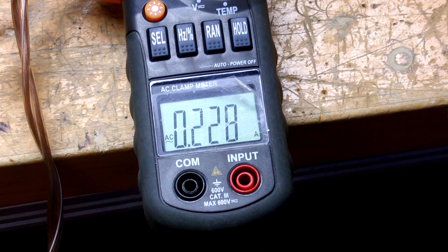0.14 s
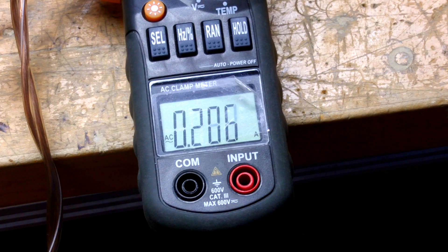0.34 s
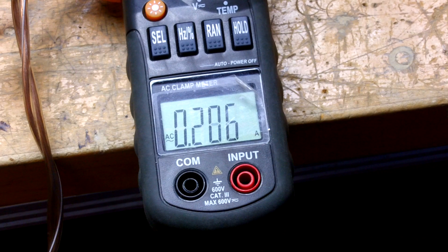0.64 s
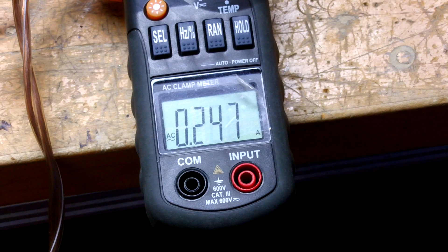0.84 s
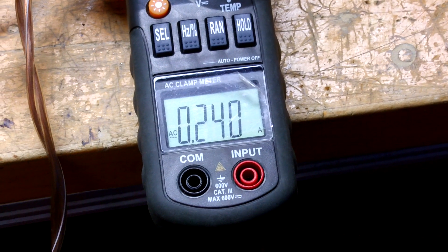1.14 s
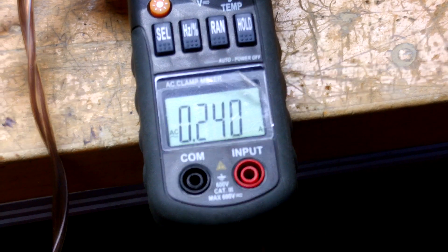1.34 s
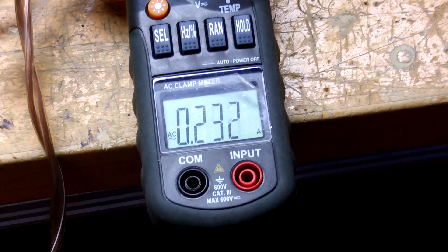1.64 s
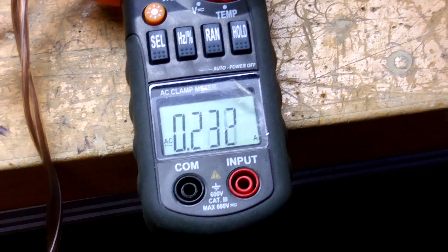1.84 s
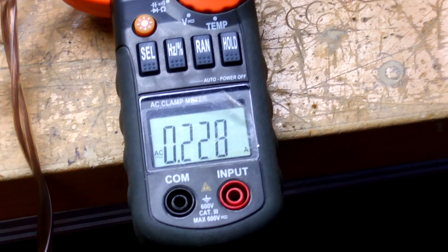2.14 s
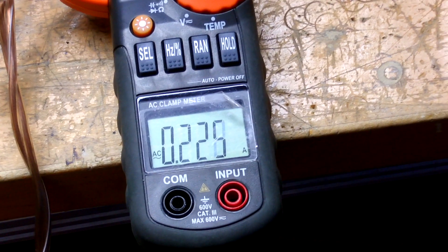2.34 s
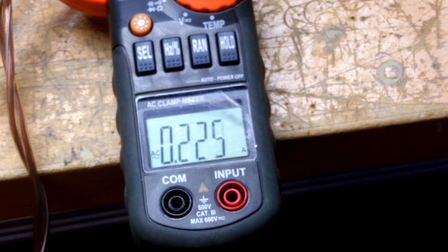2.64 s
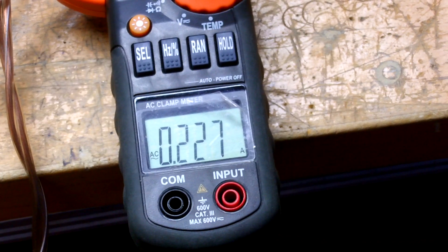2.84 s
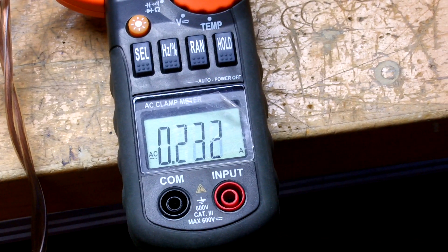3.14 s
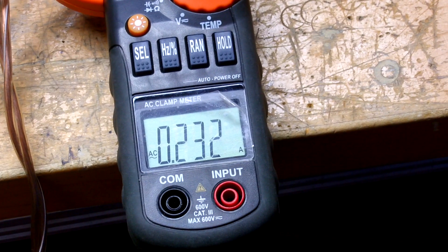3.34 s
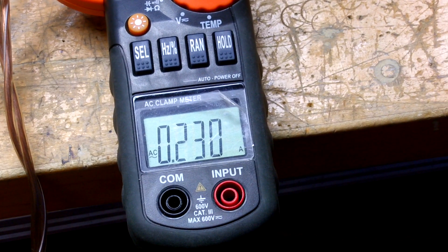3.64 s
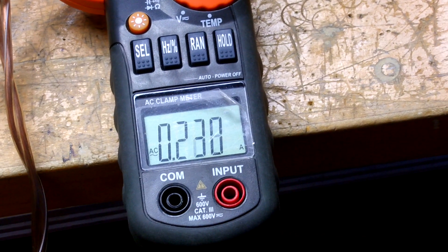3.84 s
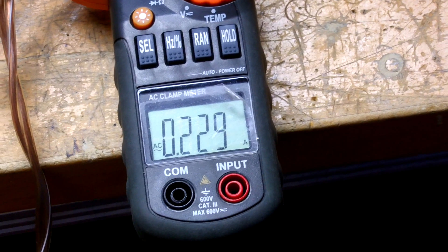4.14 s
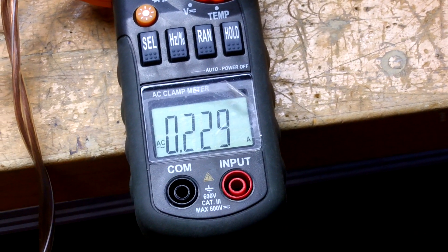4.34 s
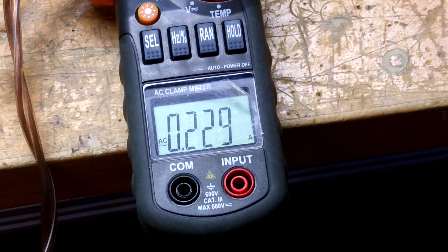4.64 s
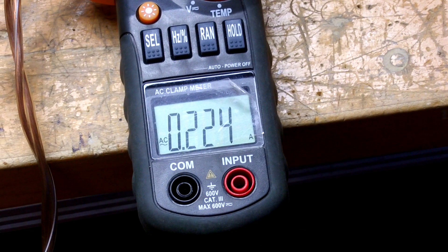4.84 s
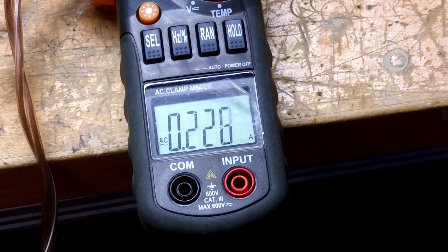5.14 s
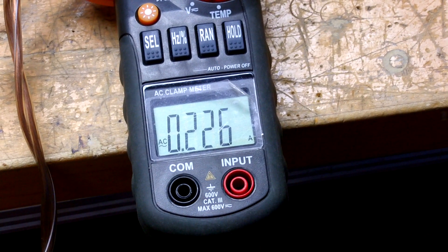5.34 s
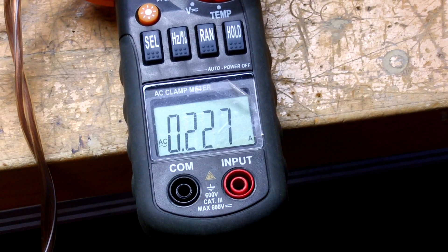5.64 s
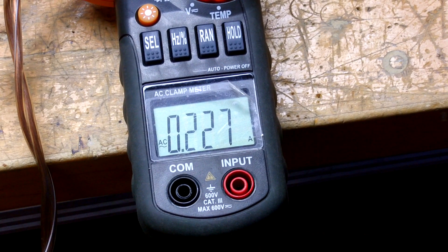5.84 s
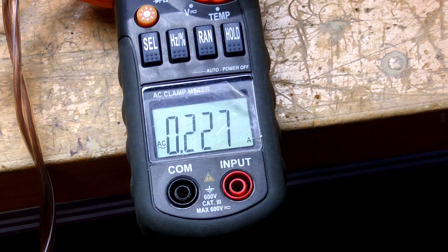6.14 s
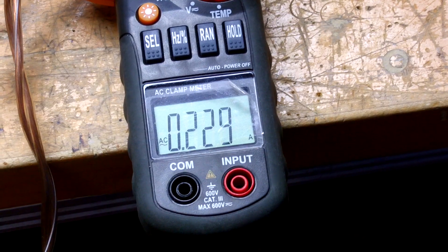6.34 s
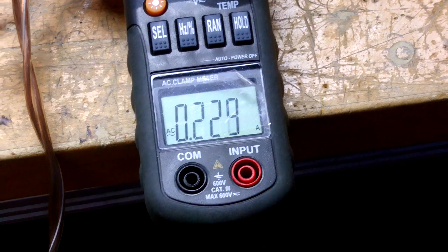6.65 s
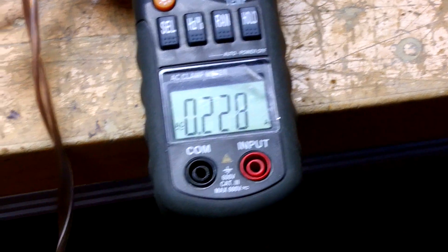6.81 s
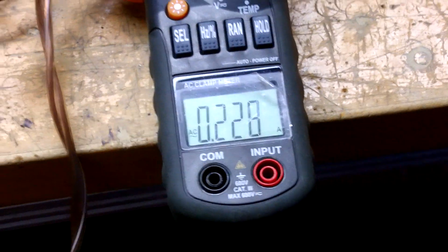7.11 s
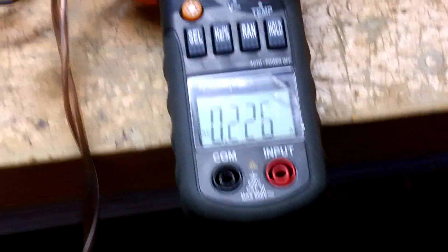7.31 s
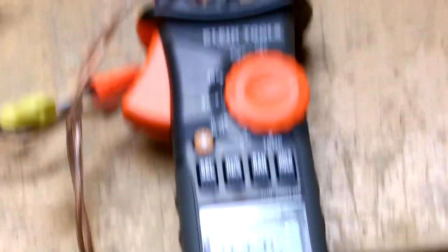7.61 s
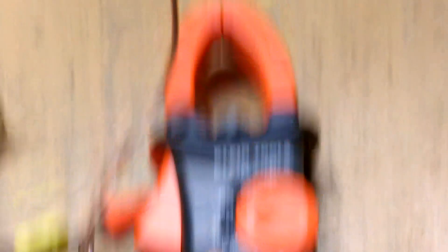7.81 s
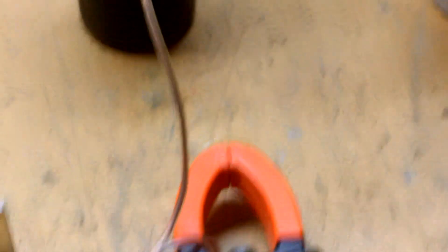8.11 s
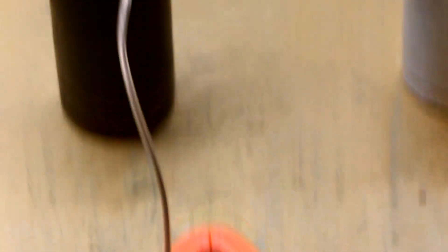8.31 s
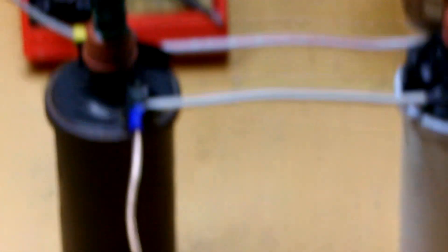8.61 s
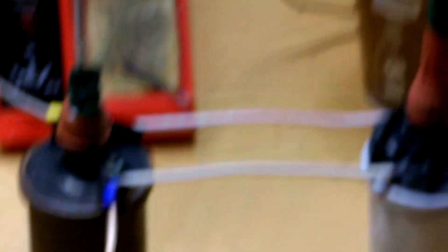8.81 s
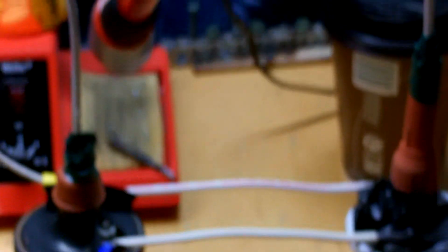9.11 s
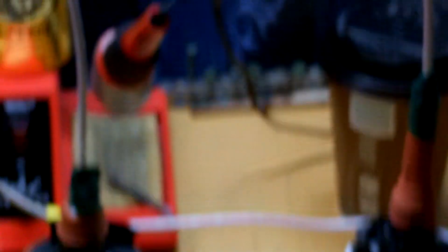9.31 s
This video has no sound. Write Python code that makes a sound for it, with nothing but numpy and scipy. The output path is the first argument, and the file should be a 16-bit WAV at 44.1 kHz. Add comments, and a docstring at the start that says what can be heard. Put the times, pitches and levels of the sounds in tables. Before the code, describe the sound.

Irregular dry electric cracks and hissing arc fizz buzz on at mains rate, with brief metallic bench ringing and a short room tail.

```python
"""High-voltage spark gap on a workbench

A mains-fed coil arcs close to a hand-held camera: sharp snaps near the mains crests, or a held, sizzling arc.
Snaps are filtered impulses; fizz is weak snaps and stray ticks; sizzle is sparse noise gated by mains phase.
Moving echoes, bench modes and a sparse-tap room answer them; filters give camera aim and microphone ports.
Faint rumble and hum lie below; the loudest peaks overload into thumps, are limited and clipped."""
import sys
import numpy as np
from scipy import signal
from scipy.fft import rfft, irfft, next_fast_len
from scipy.io import wavfile
from scipy.ndimage import uniform_filter1d, minimum_filter1d, map_coordinates

SR = 44100
rng = np.random.default_rng(int(sys.argv[2]) if len(sys.argv) > 2 else 0)


def int16_out(signal):
    """Quantize to a 16-bit WAV file."""
    q = np.round(np.clip(np.atleast_2d(signal).T, -1, 1) * 32767)
    wavfile.write(sys.argv[1], SR, q.astype(np.int16))


N = 417627
TIME = np.arange(N) / SR
MAINS_HZ = 59.991
EDGE_HZ = 16400
# two breakdown points after the cycle start, and rms jitter
EARLY_S, LATE_S, JITTER_S = .0016, .0031, .00025

# prominent sparks [t/s, relative energy/dB, extra weight below crossover/dB]
SPARKS = [(0.0032, 6, 9), (0.0276, 2.5, 7), (0.111, 4, 5), (0.1204, -1, 9), (0.1867, 0, 7), (0.2032, 4, 7),
          (0.2176, 5, 4), (0.336, 6.5, 7), (0.3697, 8, 4), (0.3841, 1, 4), (0.4346, 3.5, 7.5),
          (0.5179, 4.5, -2), (0.5516, 6.5, -9), (0.6181, 6.5, -3), (0.638, 5.5, 3), (0.6531, 5.5, -6),
          (0.753, 7.5, 3), (0.8005, 8.5, -0.5), (0.82, 4.5, -1), (0.853, 7.5, -3), (0.885, 5.5, 7),
          (0.8965, 3.5, 1), (0.9194, 4, 4), (0.9867, 4.5, 5.5), (1.0347, 3.5, -3), (1.087, 6.5, 1),
          (1.153, 4, 6.5), (1.2011, 7, 2), (1.2683, 6.0, 5.5), (1.3182, 8.5, 1.5), (1.3518, 6.5, 3),
          (1.4202, 6, 1), (1.436, 4.5, 7.5), (1.503, 4.5, 5.5), (1.553, 4, 5.5), (1.62, 3.5, -3),
          (1.6687, 6, 3.5), (1.8184, 3, -7), (1.8517, 6, 5.5), (1.8684, 5, -7), (1.9017, 6.5, 5.5),
          (1.9518, 7, 4.5), (2.0015, 3.5, 6), (2.0192, 5.5, 5), (2.0866, 6.0, 5), (2.136, 0, -4),
          (2.1516, 0.5, 0), (2.2183, 7, 5), (2.235, 6.5, 3), (2.2697, 3.5, 7.5), (2.3187, 5.5, 6.5),
          (2.335, 3, 3), (2.3458, 2.5, 10), (2.4681, 6.0, 5.5), (2.4861, 2.5, 6), (2.6015, 5.5, 4.5),
          (2.6184, 0.5, -2), (2.6362, 3, -3), (2.6699, 2.5, 8), (2.7682, 7.5, 2), (2.8535, 0.5, 6),
          (2.9681, 9, 3), (3.2017, 2, -1), (3.2534, 8.5, 2.5), (3.3683, 4, -0.5), (3.4018, 9.5, 0),
          (3.453, 10.5, 3), (3.5033, 8.5, 3.5), (3.6017, 7.0, -1), (3.819, -3.5, 5.5), (3.8518, 6, -2),
          (4.0523, 2, 1), (4.1033, 9.5, -2.5), (4.2513, 5.5, -1.5), (4.3853, 5, -1.5), (4.4853, 8, 0),
          (4.5036, 9.5, 5.5), (4.5535, 10.0, 5), (4.6534, 6.5, -2), (4.6684, 6.5, 0), (4.6863, 6.5, 4.5),
          (4.8342, 9, -4), (4.9019, 3.5, -6), (4.9188, 7.0, -0.5), (4.9629, 4, -4), (5.0019, 6.5, -0.5),
          (5.1847, 10, -0.5), (5.2191, 7, 4.5), (5.3019, 6.0, -3), (5.3537, 11.5, 0), (5.4017, 6, 2.5),
          (5.4353, 7.5, 4), (5.469, 2.5, -2), (5.5535, 2.5, -1), (5.6352, 11.5, 1), (5.6531, 5.5, -4),
          (5.6869, 10.0, 1), (5.7538, 7.5, 2), (5.7681, 8, -2), (5.8019, 7, 4), (5.9034, 6, -5),
          (5.9792, 4.5, -11), (6.003, 9.5, 1), (6.0522, 6.5, 4), (6.0853, 7, 5.5), (6.1355, 6, 5),
          (6.1703, 7.5, 5), (6.3186, 10.5, 1), (6.4184, 0.5, -1), (6.6854, 12.5, -6), (6.7188, 11, 8.5),
          (6.736, 9.5, 0.5), (6.8521, 9, -6), (6.904, 8.5, 4), (7.0208, 8, 4), (7.0886, 8.5, 2),
          (7.1543, 6, 5), (7.186, 8, 2.5), (7.2366, 8, 4), (7.2866, 6.5, 4), (7.4037, 8.5, 4.5),
          (7.5389, 6, 6), (7.6539, 0.5, 2.5), (7.7546, 10.5, 2.5), (7.8301, 6, 1), (7.9377, 8.5, 4),
          (8.0201, 6, 5), (8.1363, 0.5, -0.5), (8.202, 3, 0), (8.2209, 4.5, -8), (8.2552, 6.5, -5),
          (8.269, 6, -1), (8.2877, 11, 0.5), (8.371, 8, 5), (8.4861, 2.5, -2), (8.504, 7.0, 8),
          (8.5201, 3, 1), (8.5364, 7.0, 3), (8.6212, 6, 4.5), (8.6388, 5.5, 3.5), (8.7044, 5.0, 7),
          (8.7853, 9.5, 1), (8.9027, 1.5, -1), (9.0357, 8.0, 7.5), (9.0703, 9.0, 4), (9.1197, 6, 5),
          (9.1706, 6.5, 6.5), (9.2044, 3.5, 5), (9.236, 5.5, 2), (9.2704, 5.5, 3)]
# arc strength between the sparks [t/s, relative level/dB]
ARC = [(0, -31.5), (.4, -31.5), (1.6, -38), (1.85, -33.5), (2.75, -38.5), (3.38, -30.5), (3.66, -35),
       (4.28, -27.5), (4.68, -37.5), (5.33, -31.5), (5.75, -34), (6.12, -30.5), (6.92, -30), (7.17, -34.5),
       (7.5, -30), (7.95, -33.5), (8.33, -29.5), (9.47, -35.5)]
# how firmly the arc holds and sizzles instead of snapping [t/s, share/0-1]
HOLD = [(0, 0.39), (2.7, 0.01), (3.05, 0.6), (3.7, 0.59), (4.47, 1), (4.7, 0.02), (6.0, 0.24), (6.6, 0.99),
        (6.9, 0.64), (9.4, 0.31)]
# camera place [t/s, bench echo delay/ms, bench echo level/dB, top treble/dB, left minus right/dB]
PATHS = [(0, 1.31, -7.5, -3.5, 0.5), (2.3, 1.56, -10, 1, 0.5), (3.2, 1.45, -4, -2, 0.5),
         (4.6, 1.51, -5, -6.5, 0.4), (5.3, 1.38, -11.5, -7.5, 0.3), (6.1, 1.52, -7, -8.5, -0.2),
         (6.7, 1.57, -4, -15, 0.4), (7.4, 1.4, -7.5, -4, -0.2), (8.0, 1.6, -8, -2.5, 0),
         (8.6, 1.27, -9, -1.5, -0.8), (9.4, 1.4, -13, 3, 0.3)]
# half of a left-minus-right difference, one row per port [signed share]
SIDES = np.array([[.5], [-.5]])


def gain_of(db):
    """Decibels to amplitude."""
    return 10 ** (np.asarray(db) / 20)


def evened(x):
    """Scales to rms 1."""
    return x / np.sqrt(np.mean(x ** 2) + 1e-20)


def curve(rows, column=1):
    """One column of a time table at every sample."""
    rows = np.array(rows)
    return np.interp(TIME, rows[:, 0], rows[:, column])


def spectrum(rows, hz):
    """All value columns of a frequency table, joined on a log axis."""
    f, *columns = np.transpose(rows)
    return [np.interp(np.log(hz + 1), np.log(f + 1), c) for c in columns]


def clicks(times_s, sizes):
    """A train of single impulses."""
    index = np.clip(np.round(times_s * SR).astype(int), 0, N - 1)
    return np.bincount(index, sizes, N)


def lowpass(x, hz):
    """One-pole low-pass."""
    return signal.lfilter(*signal.butter(1, min(hz, .45 * SR), fs=SR), x)


def bandpass(x, hz, q):
    """Two-pole resonance, unity gain at its centre."""
    return signal.lfilter(*signal.iirpeak(hz, q, SR), x)


def delayed(x, ms):
    """Delays by a moving, fractional time."""
    return map_coordinates(x, [np.arange(N) - ms * SR / 1000], order=5)


def coloured(x, rows, size=4096):
    """Causal filter with the given spectrum shape and unit energy."""
    db = spectrum(rows, abs(np.fft.fftfreq(size, 1 / SR)))[0]
    log_gain = np.log(gain_of(db))
    taps = np.fft.ifft(np.exp(signal.hilbert(log_gain).conj())).real[:size // 2]
    return signal.oaconvolve(x, taps / np.linalg.norm(taps))[:N]


def sparks(level_db=0.0, crossover_hz=2200, weight_db=0., fork_db=-8.5, fork_s=.00022,
           bite_hz=4200, bite_width_hz=1600, bite_spread_db=4):
    """Each breakdown is one shock; a fat channel adds weight and its kinks arrive a little apart."""
    s, db, fat_db = np.vstack([lesser_snaps(), SPARKS]).T
    size = gain_of(db + level_db)
    shock = clicks(s, size)
    weight = clicks(s, size * (gain_of(fat_db + weight_db) - 1))
    # three kinks each, up to fork_s late, of random strength and sign
    chance = rng.random((len(s), 6))
    kinks = sum(clicks(s + fork_s * late, size * (2 * strength - 1))
                for late, strength in zip(chance.T[:3], chance.T[3:]))
    fork = gain_of(fork_db) * (kinks - lowpass(kinks, crossover_hz))
    # channel length differs per spark, and with it the bite in the upper middle
    bite_db = bite_spread_db * rng.uniform(-0.39, 1, len(s))
    bite = bandpass(clicks(s, size * (gain_of(bite_db) - 1)), bite_hz, bite_hz / bite_width_hz)
    return shock + bite + lowpass(weight, crossover_hz) + fork


def lesser_snaps(level_db=-0.25, spread_db=4, weight_spread_db=4, step=0.33, lull=.5):
    """A restless gap snaps fairly evenly on crests; a loud spark takes a cycle's charge, often after a lull."""
    # restlessness of the gap [t/s, snap chance per crest before lulls/0-1, mean extra weight/dB]
    restless = [(0, .95, -2.5), (0.552, .95, -1), (.75, .3, 6.5), (1.75, .15, -12), (1.9, .65, -5),
                (2.45, .55, -7), (3.0, 0.05, -6), (3.35, 0.49, -12), (3.6, .03, 0), (4.5, 0.14, -5),
                (4.8, .8, -19), (5.6, .85, -4), (6.3, .35, -4.5), (7.3, .03, 17.5), (8.05, .12, -9),
                (8.2, 0.4, 9), (8.7, .08, -22), (9.1, .65, 2), (9.35, 0.14, -2.5)]
    s = crests()
    turn, size, weight = rng.uniform(-1, 1, (3, len(s)))
    at, chance, weight_db = np.transpose(restless)
    loud = np.isin(np.floor(s * MAINS_HZ), np.floor(np.array(SPARKS)[:, 0] * MAINS_HZ))
    loud_next = np.roll(loud, -1)
    chance = np.interp(s, at, chance) * (1 - lull * loud_next) * ~loud
    # irregular phase steps space the snaps more evenly than independent draws
    fires = np.cumsum(step * (1 + turn / 2)) % 1 < chance
    db = np.where(fires, level_db + spread_db * size, -np.inf)
    return np.transpose([s, db, np.interp(s, at, weight_db) + weight_spread_db * weight])


def crests():
    """One moment of breakdown in every mains cycle, early or late."""
    start = np.arange(int(N / SR * MAINS_HZ)) / MAINS_HZ
    pick, jitter = rng.standard_normal((2, len(start)))
    return start + np.where(pick > 0, EARLY_S, LATE_S) + JITTER_S * jitter


def small_snaps(level_db=-2.5, spread_db=6, reverse_s=.0134, reverse_db=-10):
    """Weak breakdowns, one on each crest; the reverse half-cycle typically strikes more faintly."""
    s = crests()
    size, back_jitter, back_size = rng.standard_normal((len(s), 3)).T
    forward = clicks(s, gain_of(spread_db * np.clip(size, -2, 1.5)))
    back_s = np.arange(len(s)) / MAINS_HZ + reverse_s + JITTER_S * back_jitter
    reverse = clicks(back_s, gain_of(reverse_db + spread_db * back_size))
    loose = 1 - np.clip(curve(HOLD), 0, 1)
    return gain_of(curve(ARC) + level_db) * loose * evened(forward + reverse)


def stray_ticks(level_db=-9, per_s=45, spread_db=5.0):
    """Loose streamers tick at any moment of the cycle, more faintly as the arc holds."""
    size = gain_of(spread_db * np.minimum(rng.exponential(1, N), 3))
    ticks = size * (rng.random(N) < per_s / SR)
    loose = 1 - np.clip(curve(HOLD), 0, 1)
    return gain_of(curve(ARC) + level_db) * loose * evened(ticks)


def sizzle(level_db=-0.5, per_s=9000, flicker_db=2.5, jitter_ms=0.32):
    """The held arc breaks into swarms of tiny discharges around set points of the mains cycle."""
    # bursts [mean t after cycle start/ms, Gaussian sigma/ms, mean relative level/dB]
    bursts = [(1.8, 0.31, -2.5), (3.8, 0.36, -2.5), (8, 6.5, -22.5), (13.5, 0.47, -3.5)]
    cycle, phase = np.divmod(TIME * MAINS_HZ, 1)
    cycle, ms = cycle.astype(int), phase * 1000 / MAINS_HZ
    gate = np.zeros(N)
    for at_ms, width_ms, db in bursts:
        shift, size = rng.standard_normal((cycle[-1] + 1, 2))[cycle].T
        off_centre = (ms - at_ms - jitter_ms * shift) / width_ms
        gate += gain_of(db + flicker_db * size) * np.exp(-.5 * off_centre ** 2)
    swarm = rng.standard_normal(N) * (rng.random(N) < per_s / SR)
    held = np.clip(curve(HOLD), 0, 1) ** 0.62
    return gain_of(curve(ARC) + level_db) * held * evened(gate * swarm)


def aimed(x, top_hz=11500, presence_hz=8500, presence_width_hz=2200):
    """The treble changes with the way the camera points."""
    # band near presence_hz, sinking as the camera turns [t/s, level/dB]
    presence = [(0, 2), (3.3, 1.5), (5.6, 1.5), (6.8, -1.5), (9.4, -3.5)]
    x = x + (gain_of(curve(PATHS, column=3)) - 1) * (x - lowpass(x, top_hz))
    band = bandpass(x, presence_hz, presence_hz / presence_width_hz)
    return x + (gain_of(curve(presence)) - 1) * band


def bench(x, edge_share, second_db, edge_side_db=3.9, edge_cut_hz=3200, second_ms=2.9):
    """A small edge returns short waves inverted; bench top and gear echo the result, the edge differing by port."""
    # nearby edge as the camera moves [t/s, delay/ms, level before share and port offset/dB]
    edge_echo = [(0, .39, -5), (6.1, .39, -7), (6.7, .39, -12), (7.4, .38, -14), (8.0, .33, -16),
                 (8.6, .265, -12)]
    edge_ms, edge_db = curve(edge_echo), curve(edge_echo, column=2)
    bench_ms, bench_db = curve(PATHS), curve(PATHS, column=2)
    diffracted = edge_share * delayed(x - lowpass(x, edge_cut_hz), edge_ms)
    pair = []
    for side in (-1, 1):
        edge = gain_of(edge_db + side * edge_side_db)
        near = (x - edge * diffracted) / np.sqrt(1 + (edge_share * gain_of(edge_db)) ** 2)
        first = gain_of(bench_db) * delayed(near, bench_ms)
        second = gain_of(second_db) * delayed(near, second_ms)
        pair.append(near + first + second)
    return np.array(pair)


def ringing(x, level_db=-4, split=0.0025):
    """Bench and gear ring briefly in close pairs of modes, one of each pair nearer either port."""
    # modes [f before detuning/Hz, width before detuning/Hz, relative level/dB]
    ring = [(682, 14, 2.5), (826, 28, 1), (1076, 67, 12.5), (1330, 61, 15), (1646, 50, 12), (2140, 14, -8),
            (4390, 23, 1)]

    def modes(detune):
        """All modes at one port."""
        return sum(gain_of(db) * bandpass(x, hz * detune, hz / width_hz) for hz, width_hz, db in ring)

    return gain_of(level_db) * np.array([modes(1 + split), modes(1 - split)])


def workshop(x, t60_scale, start_s, size=256):
    """Sparse reflections that die band by band; the ports differ most in the treble."""
    # room [f/Hz, t60 before scaling/s, left-right likeness/0-1, relative level/dB]
    room_bands = [(150, 0.17, 0.76, -3), (685, 0.28, 1, 2.5), (2280, 0.32, 1, 7), (4350, 0.22, 1, 1.5),
                  (10100, 0.3, 0.18, -2), (15900, 0.048, 0.092, 6)]
    count = SR // 2
    taps = rng.standard_normal((2, count)) * (rng.random((2, count)) < 1 / 5)
    hz, t, (a, b) = signal.stft(taps, SR, nperseg=size)
    t60, same, db = spectrum(room_bands, hz[:, None])
    same = np.clip(same, -1, 1)
    decay = gain_of(db - 60 * t / (t60 * t60_scale))
    z = np.array([a, same * a + np.sqrt(1 - same ** 2) * b]) * decay
    # silent until start_s, full at twice start_s
    onset = np.clip(np.arange(count) / SR / start_s - 1, 0, 1)
    tail = signal.istft(z, SR, nperseg=size)[1][:, :count] * onset
    return signal.fftconvolve(x[None], tail / np.linalg.norm(tail[0]), axes=1)[:, :N]


def wandering_room(x, t60_scale, start_s, half_turns_per_s=2.3, count=3):
    """The arc wanders in the gap, so the mix of several reflection patterns keeps changing."""
    shares = (np.cos(np.pi * (half_turns_per_s * TIME + k / count)) * np.sqrt(2 / count)
              for k in range(count))
    return sum(workshop(x * share, t60_scale, start_s) for share in shares)


def ports(x):
    """Two microphone ports colour the treble differently; a rising delay spreads each snap by under 1 ms."""
    # ports [f/Hz, left minus right/dB, left phase lead/rad]
    port_bands = [(100, 3, 0.64), (600, 1, -0.17), (2210, 0, -0.077), (4300, -1, -0.14), (7100, 0.5, -0.57),
                  (8060, 0, 0.49), (10120, -2, -1.57), (11750, -3, 1.25), (12200, -12.5, 0.84),
                  (12800, 7, 1.6), (14000, 1, 1.27), (15700, 5, 0.9)]
    smear_s = .00028  # delay at EDGE_HZ, proportional to frequency
    size = next_fast_len(N + 4096)
    hz = np.fft.rfftfreq(size, 1 / SR)
    balance_db, lead = spectrum(port_bands, hz)
    phase = SIDES * lead - np.pi * smear_s * hz ** 2 / EDGE_HZ
    pair = gain_of(SIDES * balance_db) * np.exp(1j * phase)
    pair = pair / np.sqrt(np.mean(abs(pair) ** 2, 0))
    return irfft(rfft(x, size) * pair, size)[:, :N]


def wander(x, lag_ms=0.0069, rate_hz=25):
    """The arc jumps about in the gap, so the time difference between the ports wavers (lag_ms rms)."""
    lag = lag_ms * evened(lowpass(lowpass(rng.standard_normal(N), rate_hz), rate_hz))
    return np.array([delayed(port, side * lag) for port, side in zip(x, SIDES)])


def background(waver_hz=3, waver=0.32, apart=0.18):
    """Faint low rumble with a slightly wavering hum that swells while the arc holds."""
    # rumble [f/Hz, relative level/dB]
    rumble = [(20, -1), (60, 6), (120, 2), (250, 9.5), (500, -6), (2000, -8), (16000, -28)]
    # hum partials [f/Hz, relative level/dB]
    hum_partials = [(111, -7), (135, -11.5), (170, -7), (221, -2.5), (400, -5.5), (600, 2), (810, 2)]
    # rumble and hum together [t/s, level/dB]
    floor_level = [(0, -84), (2.6, -86), (3.4, -77.5), (4.4, -77), (4.7, -83), (6.2, -82.5), (7.6, -82),
                   (9.4, -83)]
    mid, side = (evened(coloured(rng.standard_normal(N), rumble)) for _ in range(2))
    hum = np.zeros(N)
    for hz, db in hum_partials:
        swell = 1 + waver * evened(lowpass(lowpass(rng.standard_normal(N), waver_hz), waver_hz))
        hum += gain_of(db) * evened(swell * np.sin(2 * np.pi * (hz * TIME + rng.random())))
    centre = mid + hum * (0.49 + curve(HOLD))
    return gain_of(curve(floor_level)) * (centre + apart * np.array([side, -side]))


def scene(clutter_db=-12, room_db=-8.0):
    """All discharges share the paths; weak ones are spread along the gap, which blurs their edge echo."""
    # clear spark [f/Hz, relative level/dB]
    snap_colour = [(40, -54), (200, -30.5), (400, -22.5), (660, -16), (1350, -15), (3100, -9), (3850, -2.5),
                   (6500, -2.5), (8500, 3), (11700, 7.5), (13000, 8), (14800, -3), (15500, 8), (16300, -14)]
    # tiny discharges, thinner [f/Hz, relative level/dB]
    fizz_colour = [(40, -38), (400, -28.5), (1000, -24), (2900, -9.5), (3800, -7.5), (5500, -4),
                   (7200, -1.5), (8500, 4.5), (11700, -5), (14800, 2.5), (15500, -18), (16300, -29)]
    # held arc, hollow below the upper middle [f/Hz, relative level/dB]
    held_colour = [(40, -46), (400, -26.5), (1000, -26), (3000, -11.5), (3700, -2.5), (5500, -1),
                   (7200, -2.5), (8500, 5.5), (11700, 0), (14800, 13), (15400, -15), (16300, -33)]
    snaps = aimed(coloured(sparks(), snap_colour))
    fizz = aimed(coloured(small_snaps() + stray_ticks(), fizz_colour))
    held = aimed(coloured(sizzle(), held_colour))
    arc = snaps + fizz + held
    near = bench(snaps, edge_share=0.5, second_db=-14)
    near += bench(fizz, edge_share=0.27, second_db=-11)
    near += bench(held, edge_share=0.13, second_db=-5)
    clutter = gain_of(clutter_db) * wandering_room(arc, t60_scale=0.15, start_s=0.0015)
    room = gain_of(room_db) * wandering_room(arc, t60_scale=0.52, start_s=0.0018)
    heard = wander(ports(near + ringing(arc) + clutter + room))
    return heard * gain_of(SIDES * curve(PATHS, column=4)) + background()


def overload(dry, onset=0.86, thump_db=-11, thump_hz=200):
    """Driven too hard, the input stage rectifies the peaks into a soft low thump."""
    excess = np.tanh(np.maximum(abs(dry).mean(0) - onset, 0))
    return dry + gain_of(thump_db) * lowpass(excess, thump_hz)


def record(dry, limit=1.5, hold_s=0.001):
    """A fast limiter squeezes the loudest snaps, remaining peaks clip; then the band limit."""
    size = 2 * int(hold_s * SR / 2) + 1
    driven = overload(dry)
    allowed = np.minimum(1, limit / (abs(driven).max(0) + 1e-9))
    limited = driven * uniform_filter1d(minimum_filter1d(allowed, size), size)
    clipped = np.clip(limited, -.92, .92)
    band_limit = signal.firwin(255, EDGE_HZ, window=("kaiser", 8), fs=SR)
    return signal.oaconvolve(clipped, band_limit[None], "same")


dry = scene()
out = record(dry)
int16_out(out)
```